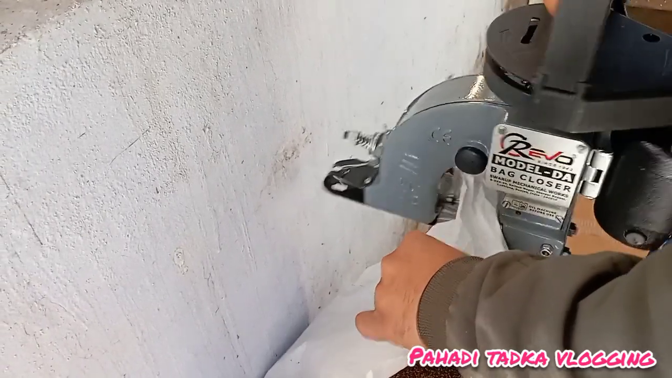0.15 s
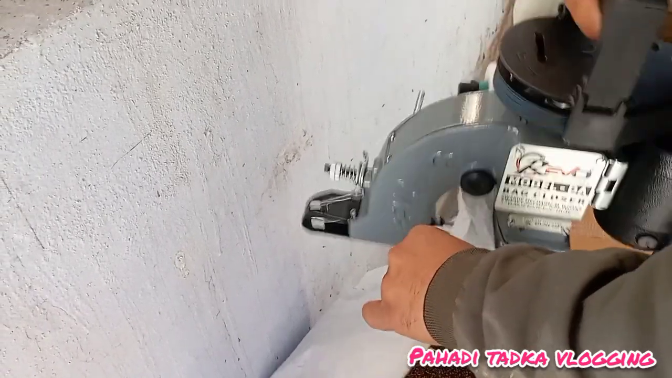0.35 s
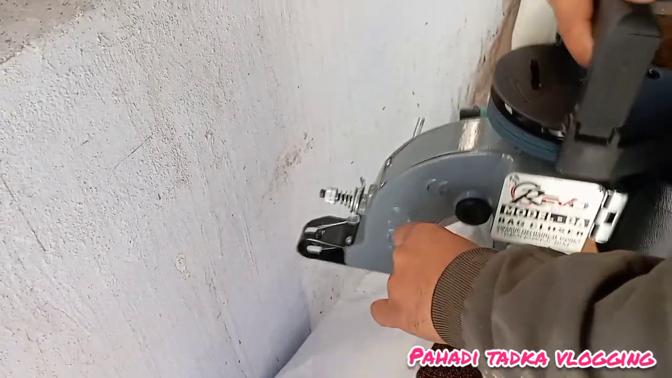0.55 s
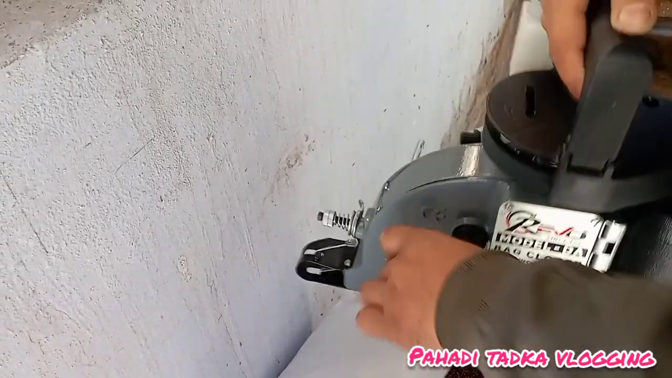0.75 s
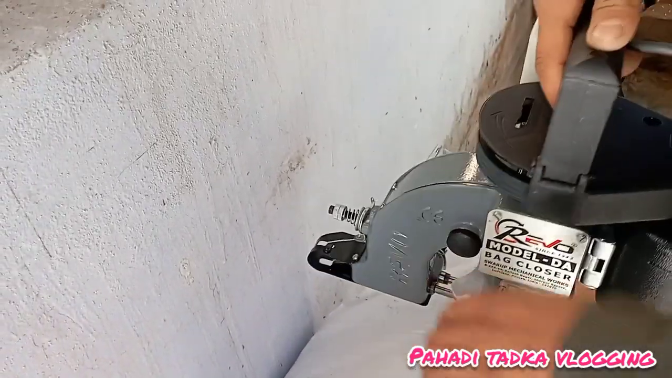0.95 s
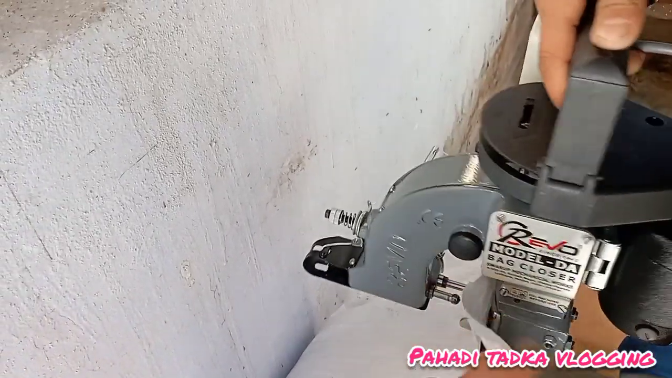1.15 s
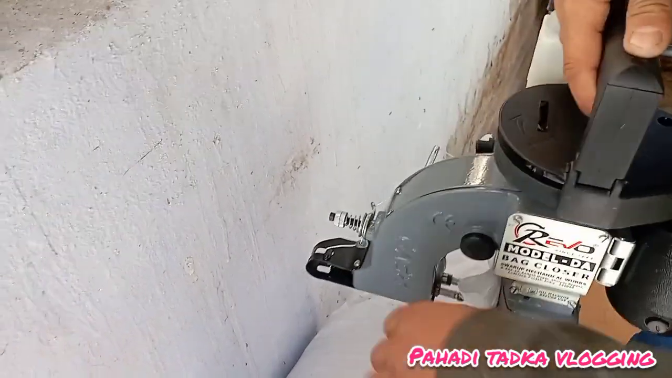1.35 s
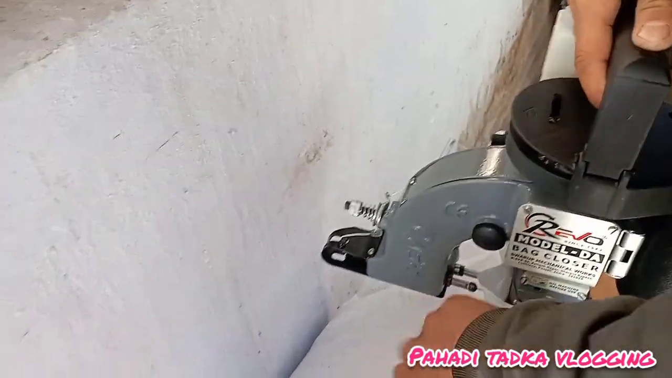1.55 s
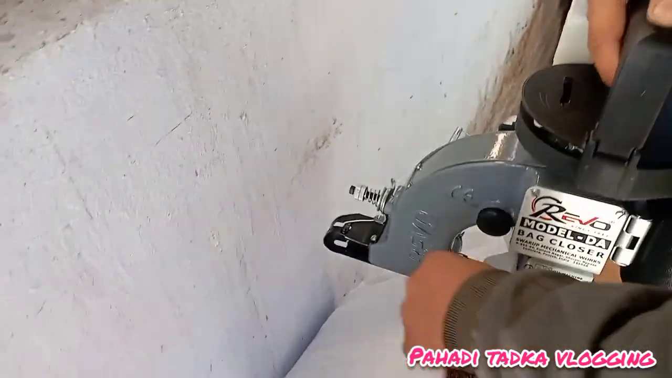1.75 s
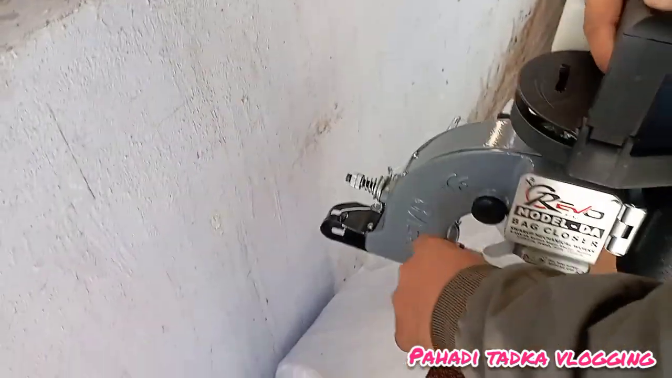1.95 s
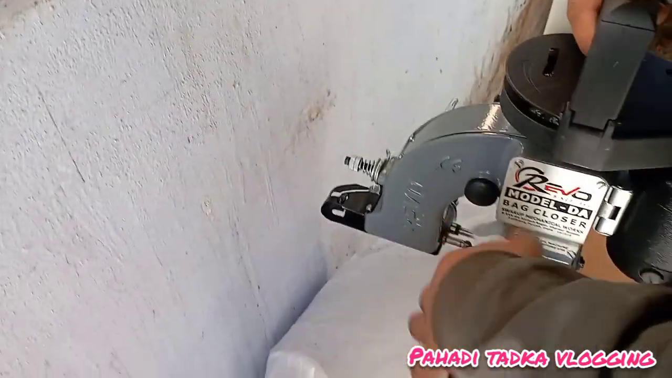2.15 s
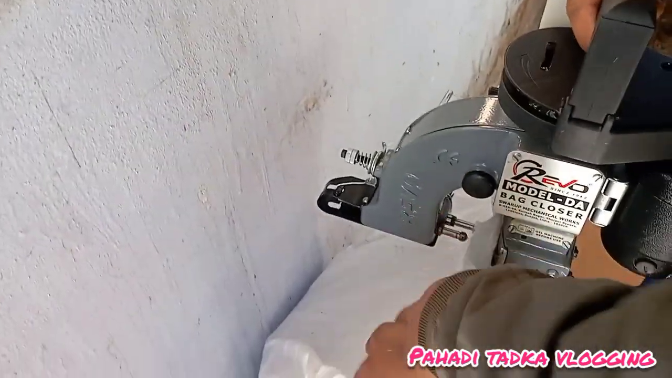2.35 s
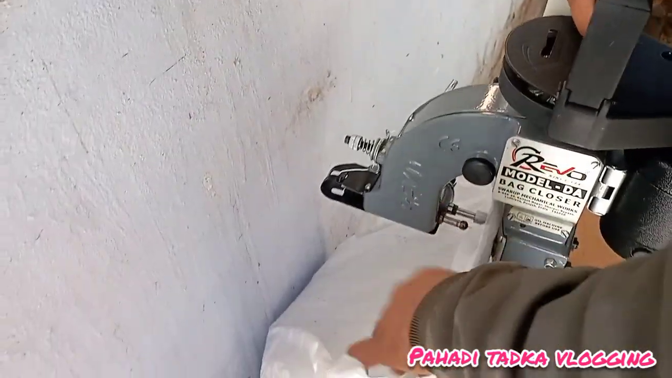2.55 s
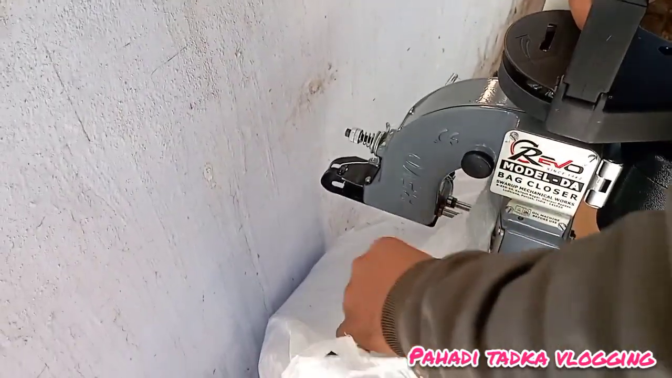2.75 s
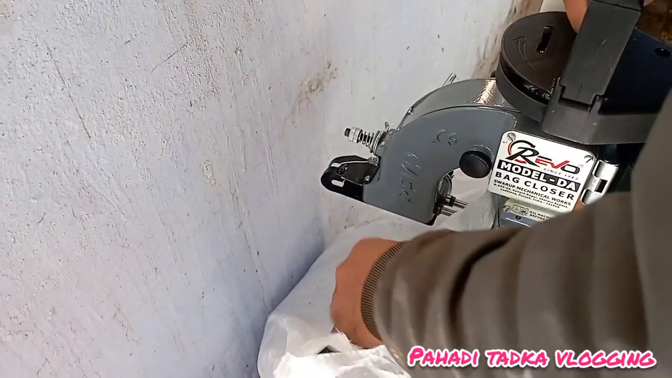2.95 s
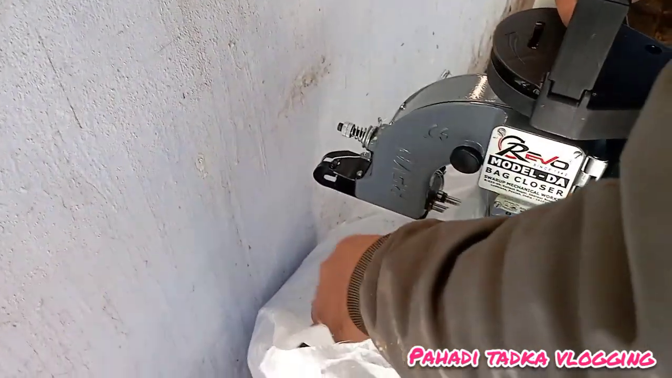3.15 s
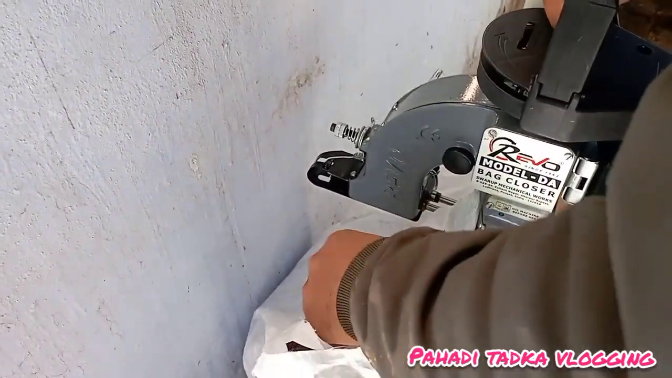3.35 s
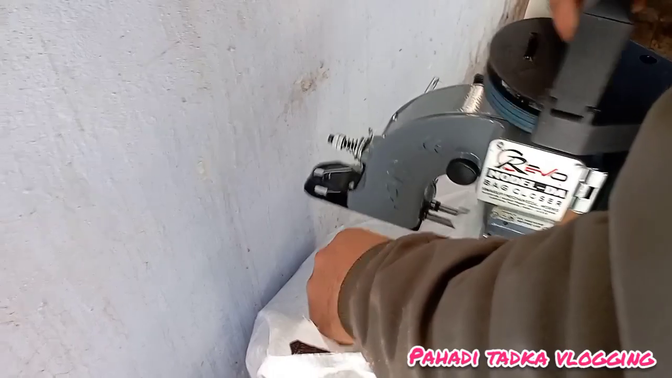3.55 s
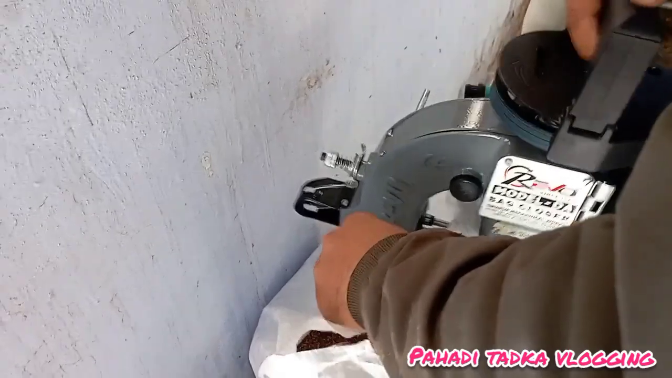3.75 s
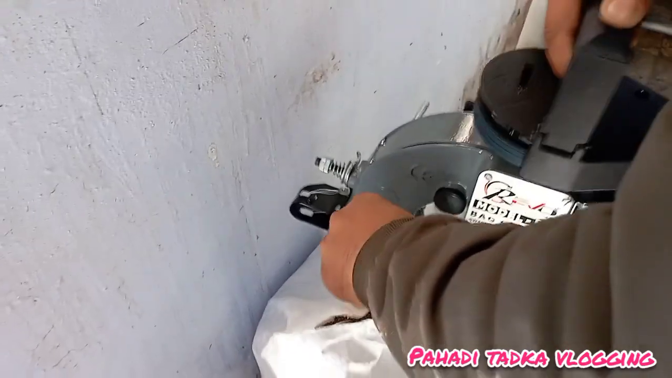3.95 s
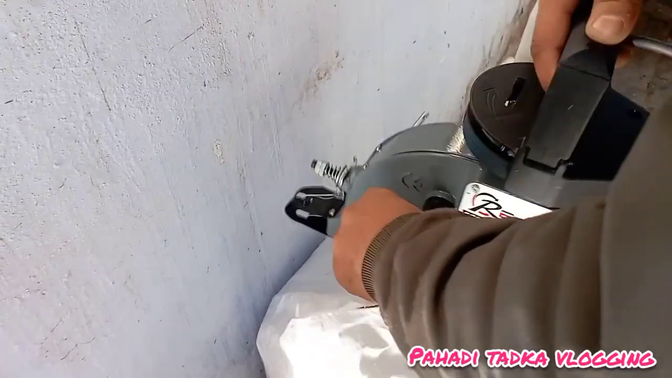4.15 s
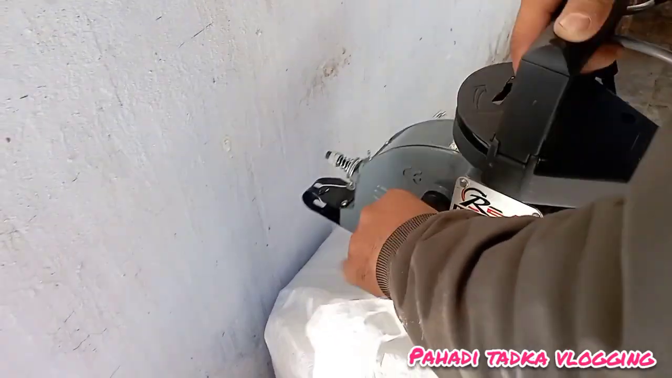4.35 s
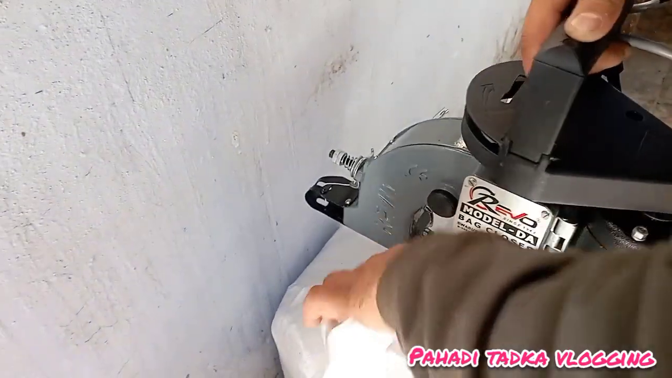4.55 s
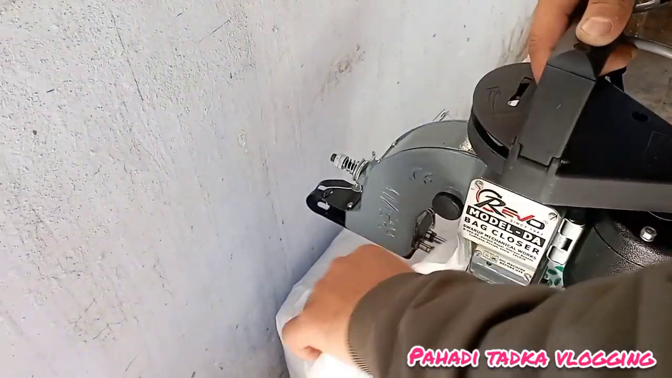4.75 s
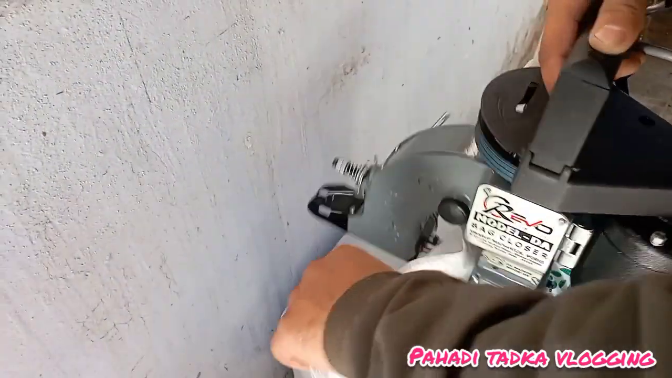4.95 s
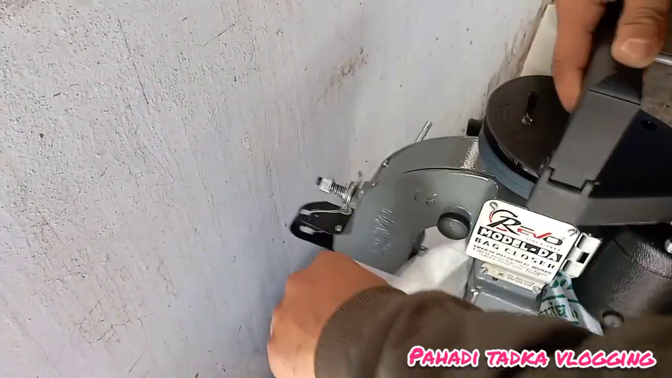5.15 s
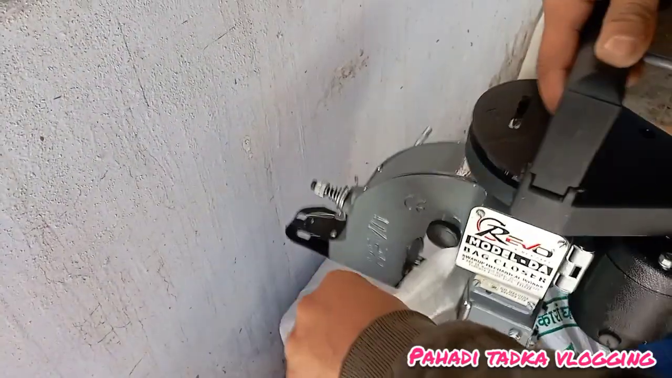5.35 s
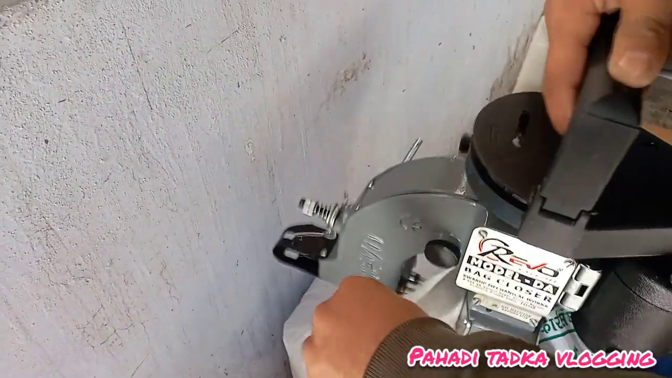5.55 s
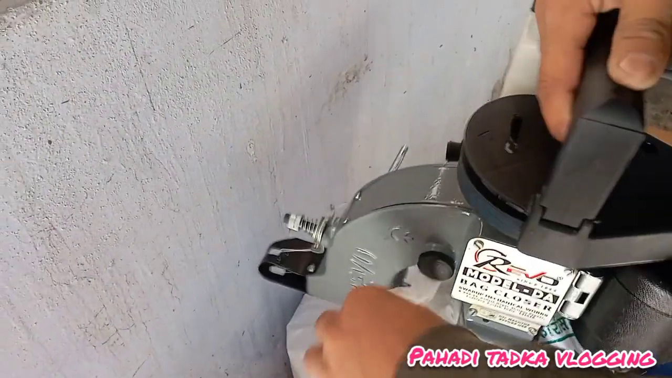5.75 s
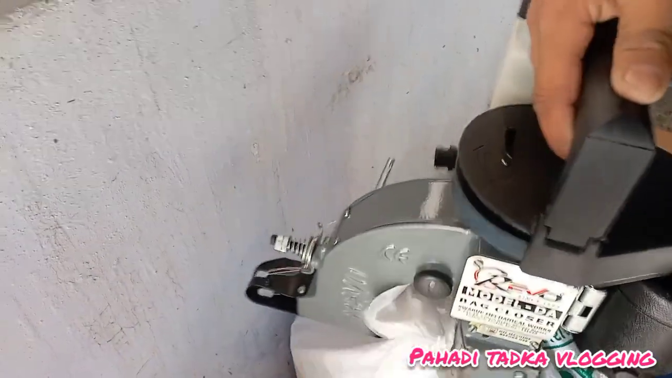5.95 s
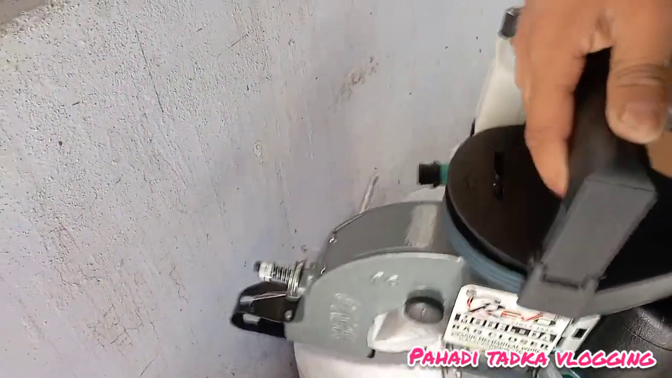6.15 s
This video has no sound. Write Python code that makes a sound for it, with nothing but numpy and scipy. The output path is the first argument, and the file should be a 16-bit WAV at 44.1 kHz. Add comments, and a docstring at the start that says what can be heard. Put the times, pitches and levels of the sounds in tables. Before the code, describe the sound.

Close up, an electric stitching motor revs and winds down, needle mechanism knocking rapidly, with sharp plastic sack creases in the pauses and a final sustained run.

```python
"""Sack-sewing machine in short bursts

A handheld sack-sewing machine runs in short bursts close to a phone with two microphone ports.
The motor whines up and coasts down as slot tones, over filtered noise for brushes and fan;
the needle drive knocks three times a stitch, striking decaying casing and frame modes.
Between bursts a hand creases the woven sack: noise slips crackle, creases snap, the bag rubs in the bass.
"""
import sys
import numpy as np
from scipy import signal
from scipy.fft import rfft, irfft
from scipy.io import wavfile
from scipy.ndimage import uniform_filter1d

SR = 44100
rng = np.random.default_rng(int(sys.argv[2]) if len(sys.argv) > 2 else 0)


def digitize_waveform(pressure):
    """Quantize a signal to 16-bit integers and store it at the path in sys.argv[1].

    Rows of a 2-D input are taken as channels; values are limited to [-1, 1].
    """
    field = np.atleast_2d(pressure).T
    bounded = np.clip(field, -1, 1)
    quanta = np.round(bounded * 32767).astype(np.int16)
    wavfile.write(sys.argv[1], SR, quanta)


def volts_from_db(level):
    """Convert decibel levels to linear amplitude ratios."""
    exponent = np.asarray(level, float) / 20
    return 10 ** exponent


N = 274302
TIME = np.arange(N) / SR

# All levels are relative.
# hand on the sack: start_s, crackle_db, brightness_db_per_octave (about 6 kHz), rub_db
SACK_HANDLING = [(0, -34, 0.8, -35), (.12, -49, -1, -41.5), (.95, -70, -11, -42.5), (1.1, -42, 1, -42.5),
                 (1.46, -52.5, 3, -52), (1.49, -39.5, 3.5, -43.5), (1.63, -46.5, 2.5, -53),
                 (1.68, -46, 2, -40.5), (2.0, -51, 2, -54), (2.12, -46.5, 2.5, -47.5),
                 (2.26, -49.5, 7, -51.5), (2.38, -48, 0.8, -45.5), (2.56, -37.5, 0.1, -40),
                 (2.7, -45.5, 1.5, -44), (2.95, -49, 1, -51), (3.05, -41.5, 2, -47), (3.17, -52, 1.5, -52),
                 (3.5, -54, 0, -55), (4.38, -48, -3.5, -41), (4.51, -46, 1.5, -46), (4.59, -39.5, 0, -41.5),
                 (4.8, -48, 1, -48.5), (4.92, -50.5, 0, -53)]
# loud creases: start_s, peak_db, pitch_hz, lows_db (300 to 2000 Hz, against the snap)
LOUD_CREASES = [(0.0543, -33, 3270, 6), (0.084, -31, 7200, -4), (1.119, -16, 4340, -32),
                (1.2217, -27, 7300, -21), (1.3309, -43, 6780, -19), (1.479, -27, 6510, -22),
                (1.5546, -28, 7710, -3), (1.6379, -19.5, 4470, -27), (1.651, -25, 7800, -34),
                (1.6746, -21, 4280, -24), (1.6827, -18.5, 5840, -15), (1.9014, -29, 7000, -25),
                (2.0083, -35, 5000, -18), (2.0582, -34, 3870, -21), (2.2624, -29, 6480, -16),
                (2.3187, -15, 5900, -27), (2.3397, -29, 6000, -11), (2.4482, -24.5, 2550, 1.5),
                (2.639, -25, 6060, -6), (2.7687, -30, 5820, -13), (2.8033, -12.5, 5400, -25),
                (2.9741, -25, 5950, -13), (3.0077, -20.5, 6400, -25), (3.1268, -45, 5880, -27),
                (3.148, -28, 5700, -7), (3.1572, -29, 6570, -23), (3.1921, -30.5, 6440, -4.5),
                (3.2809, -29.5, 6700, -16), (3.3473, -28, 6630, -18), (3.364, -33.5, 6850, 0),
                (3.4595, -32.5, 7200, -20), (3.4805, -32, 4600, -24), (3.519, -25.5, 7140, -13),
                (4.8196, -22.5, 6860, -16), (4.9487, -22.5, 6800, -15)]
# spectrum of the crackling weave: frequency_hz, level_db
WEAVE_SPECTRUM = [(410, -19), (700, -3.5), (1030, -10.5), (2100, -5.5), (3000, -7), (4010, -3), (5020, -7),
                  (7270, -2.5), (9340, -12), (11000, -11.5), (15000, -19), (15900, -21), (16500, -38)]
# spectrum of the heavy bag rubbing: frequency_hz, level_db
RUB_SPECTRUM = [(18, -72), (30, -54), (57, -7.5), (113, -1), (317, -5), (355, -3), (439, -11.5), (535, -8),
                (640, -12.5), (1500, -25), (1950, -26), (3300, -120)]
# trigger pulls: on_s, off_s, free_running_slot_rate_hz
TRIGGER_PULLS = [(-.9, -.31, 2190), (.1358, .67, 2181), (3.5141, 4.09, 2207), (4.9276, 7, 2215)]
# level against motor speed: level_db at 2200 slots/s, then loss_db per halving under power and coasting
HISS_BY_SPEED = (-17.5, 10.1, 10.4)
DRIVE_BY_SPEED = (-25, 7.3, 5.8)
WHINE_BY_SPEED = (-29, 6, 9)
# the running machine swells and sinks as it is moved about: start_s, hiss_db, needle_drive_db, whine_db
MACHINE_SWAY = [(.25, 2, -0.5, 4.5), (.36, 2, 1.4, 7), (.46, -0.3, 0.5, -2.5), (.68, 0, 2.5, 3),
                (.9, 0, 0.5, 10), (3.6, 0.4, 1.5, 5), (3.87, .5, 4.5, 1), (4.0, -1, -2, -10),
                (4.15, -1.9, 1.5, 5), (5.0, -0.8, 3, 7.2), (5.23, 1.5, 1.5, -6), (5.48, -0.3, 0.9, 3),
                (5.71, -.5, .1, -3.5), (5.95, 1.5, -1, 3.5), (6.22, .5, -1, 5)]
# whine partials: multiple of slot rate, clean_db, smeared_db, smear_rate_hz,
# slow_loss_db (per halving of speed, before the power or coasting share)
WHINE_PARTIALS = [(1, -9, -13, 110, 4), (1.091, -4, -18, 120, 60), (1.136, -4, -18, 120, 60),
                  (2, 2, -9, 250, 16), (3, -12, 1, 704, 45), (4, -22, -3, 600, 45), (5, -17.5, -5, 700, 45)]
# casing response to the whine: frequency_hz, level_db
SHELL_RESPONSE = [(300, -22), (640, -8), (750, 11), (880, -3), (1100, -3), (1300, -1), (1670, 4),
                  (2050, -7), (2260, -10), (2400, 4), (2530, -8), (2900, -9), (3500, 3), (4400, 1),
                  (12000, 1)]
# spectrum of brushes and fan: frequency_hz, level_db
HISS_SPECTRUM = [(600, -30.5), (1000, -14.5), (1450, -18.5), (1670, -12.5), (2030, -14), (2440, -13.5),
                 (2850, -17), (3900, -9.5), (5200, -14), (6790, -1.5), (9400, -9.5), (10900, -10.5),
                 (15200, -18.5), (16500, -79)]
# one main knock of each burst, to which its stitches are aligned: start_s
MAIN_KNOCKS = [.519, 3.857, 5.6275]
# knocks within a stitch: share of the cycle, casing_db, frame_thud_db, tick_db
STITCH_KNOCKS = [(.001, 0, -3, -1), (.33, -12, -9, -8), (.6, -6, 0, -2)]
# casing modes: pitch_hz, level_db, t60_s
CASING_MODES = [(743.7, -0.5, 0.084), (840.4, -5, 0.044), (1190, -8, 0.0087), (665, -4.5, 0.032)]
# frame and arm modes: pitch_hz, level_db, t60_s
FRAME_MODES = [(115.7, -4.5, 0.26), (178.4, -1, 0.096), (294.6, -2, 0.096), (344.7, -4, 0.16),
               (404.6, 3.5, 0.053), (506.5, -10, 0.16), (564, -0.5, 0.052)]
# direct sound reaching the left port behind the phone: frequency_hz, level_db
PHONE_SHADOW = [(40, -.4), (120, -.15), (300, -.6), (800, -1.2), (1300, -7), (2500, -13)]
# left port over right port: frequency_hz, level_db
PORT_BALANCE = [(60, 1.5), (150, 1.5), (380, -1.5), (700, -1.5), (1300, -1), (2400, -2), (3500, -9),
                (5500, -13), (7500, -10), (9500, -3), (12000, -11), (15000, -11)]
# microphone bass response: frequency_hz, level_db
MIC_RESPONSE = [(20, -56), (50, -5), (90, -3.5), (130, -1.5), (300, 0.08)]


def curve(table):
    """Columns of a row table along the time axis."""
    start_s, *columns = np.transpose(table)
    return [np.interp(TIME, start_s, column) for column in columns]


def unit(x):
    """Scale to rms 1."""
    return x / np.sqrt(np.mean(x ** 2))


def read(points, hz):
    """Level in dB of a spectrum at given frequencies, on a log frequency axis."""
    f, db = np.transpose(points)
    return np.interp(np.log(hz + 1), np.log(f), db)


def colour(x, points):
    """Causal filter with the given spectrum, from the folded cepstrum."""
    log_gain = read(points, np.fft.rfftfreq(4096, 1 / SR)) * np.log(10) / 20
    cepstrum = irfft(log_gain)
    cepstrum[1:2048] *= 2
    cepstrum[2049:] = 0
    return signal.fftconvolve(x, irfft(np.exp(rfft(cepstrum))))[:N]


def band_noise(noise, order, low_hz, high_hz):
    """Noise held to one band."""
    return signal.lfilter(*signal.butter(order, [low_hz, high_hz], "band", fs=SR), noise)


def walk(rate_hz):
    """Smoothed random drift of rms 1."""
    k = max(int(SR / rate_hz), 2)
    return unit(uniform_filter1d(uniform_filter1d(rng.standard_normal(N), k), k))


def grit(per_s, spread_db):
    """Random clicks of uneven size."""
    size_db = spread_db * np.minimum(rng.exponential(size=N), 3)
    return (rng.random(N) < per_s / SR) * np.sign(rng.standard_normal(N)) * volts_from_db(size_db)


def bursts(per_s, spread_db, t60_s):
    """Envelope of random slips, each dying away in a few ms."""
    fall = volts_from_db(-60 / (t60_s * SR))
    return unit(signal.lfilter([1], [1, -fall], np.abs(grit(per_s, spread_db))))


def crackle(bright_db):
    """Plastic threads slip in clusters; every octave also has slips of its own."""
    shared = bursts(120, 4.5, 0.009)
    out = 0
    for hz in (1000, 2000, 4000, 8000, 14000):
        edges_hz = [hz / 2 ** 0.5, min(hz * 2 ** 0.5, 20000)]
        band = signal.butter(2, edges_hz, "band", fs=SR, output="sos")
        slips = 1.46 + shared + 0.49 * bursts(100, 4.6, 0.013)
        tilt = volts_from_db(bright_db * np.log2(hz / 6000) + 1.2 * walk(18))
        out = out + tilt * slips * signal.sosfilt(band, rng.standard_normal(N))
    return colour(out, WEAVE_SPECTRUM)


def settling():
    """Power of the crackle set off by each loud crease, dying away as the weave settles."""
    below_peak_db, t60_s = -20, 0.24
    kicks = np.zeros(N)
    for start_s, peak_db, *_ in LOUD_CREASES:
        kicks[int(start_s * SR)] = volts_from_db(2 * (peak_db + below_peak_db))
    return signal.lfilter([1], [1, -volts_from_db(-120 / (t60_s * SR))], kicks)


def rub():
    """The heavy bag rubs: unsteady noise, mostly bass."""
    return unit(colour(rng.standard_normal(N) * volts_from_db(walk(39)), RUB_SPECTRUM))


def small_creases(crackle_db):
    """Sixty creases at random times and pitches, their peaks riding on the crackle level."""
    over_crackle_db, scatter_db = 9, 2.5
    low_hz, high_hz, lows_db = 3840, 8150, -13
    small = []
    for when, size, pitch in rng.random((60, 3)):
        start_s = when * TIME[-2001]
        peak_db = np.interp(start_s, TIME, crackle_db) + over_crackle_db - scatter_db * np.log(1 - size)
        small.append((start_s, peak_db, low_hz + (high_hz - low_hz) * pitch, lows_db))
    return small


def add_creases(out, creases):
    """Each crease is a snap of band noise with a thump below, rising in 0.45 ms and dying fast."""
    t = TIME[:2000]
    shape = volts_from_db(-60 * t / 0.013) * np.minimum(t / 0.00045, 1)
    noise = rng.standard_normal((len(creases), 2, len(t)))
    for (start_s, peak_db, hz, lows_db), (high, low) in zip(creases, noise):
        snap = band_noise(high, 2, hz * 0.68, min(hz * 1.53, 18000)) * shape
        thump = band_noise(low, 1, 300, 2000) * shape
        i = int(start_s * SR)
        both = snap / np.abs(snap).max() + volts_from_db(lows_db) * thump / np.abs(thump).max()
        out[i:i + len(t)] += volts_from_db(peak_db) * both


def sack():
    """The weave crackles, single creases snap and settle, the heavy bag rubs in the bass."""
    crackle_db, bright_db, rub_db = curve(SACK_HANDLING)
    crackle_level = np.sqrt(volts_from_db(2 * crackle_db) + settling())
    out = crackle_level * unit(crackle(np.clip(bright_db, -5, 5)))
    out += volts_from_db(rub_db) * rub()
    add_creases(out, small_creases(crackle_db) + LOUD_CREASES)
    return out


def speed():
    """Slot rate: torque fades as the rotor nears its free speed; bearings and fan brake it after release."""
    spin_up_s, spin_up_power = 0.2172, 2.632
    bearing_drag_hz_per_s, fan_drag_s = 3550, 0.62
    stall = bearing_drag_hz_per_s * fan_drag_s
    hz = np.full(N, 2.0)
    for on_s, off_s, top_hz in TRIGGER_PULLS:
        powered_s = np.clip(TIME - on_s, 0, off_s - on_s)
        spun = top_hz * (1 - (1 + powered_s / spin_up_s) ** -spin_up_power)
        coast = np.exp(-np.maximum(TIME - off_s, 0) / fan_drag_s)
        hz = np.maximum(hz, (spun + stall) * coast - stall)
    return hz


def loudness(hz, law):
    """Level in dB from speed, with one slope under power and another while coasting."""
    top_db, powered_db, coasting_db = law
    coasting = uniform_filter1d(1.0 * (np.gradient(hz) <= 0), 400)
    return top_db + np.log2(hz / 2200) * (powered_db + (coasting_db - powered_db) * coasting)


def brush_and_fan_hiss():
    """Turbulent, fluttering fan noise with the gritty clicks of the brushes."""
    air = rng.standard_normal(N) * volts_from_db(1.26 * walk(240))
    return unit(colour(air + 0.47 * unit(grit(1500, 5.9)), HISS_SPECTRUM))


def whine(hz, slots):
    """Slot tones, part clean, part smeared as the stitch load makes the speed waver, shaped by the casing."""
    tones = 0
    octaves = np.log2(hz / 2200)
    steady_db = 18 * octaves  # upper tones sharpen only near full speed
    # no current, no magnetic pull on the slots
    coasting = uniform_filter1d(1.0 * (np.gradient(hz) < 0), 1500)
    for k, clean_db, smear_db, smear_rate_hz, slow_db in WHINE_PARTIALS:
        wobble = walk(smear_rate_hz) + 1j * walk(smear_rate_hz)
        clean = volts_from_db(clean_db + (k - 1) * steady_db + 1.2 * walk(20))
        tone = (clean + volts_from_db(smear_db) * wobble) * np.exp(2j * np.pi * k * slots)
        level_db = read(SHELL_RESPONSE, k * hz) + slow_db * octaves * (0.5 + 0.35 * coasting)
        tones = tones + volts_from_db(level_db) * tone.real
    return tones


def ring(x, modes):
    """Strike decaying modes; neighbours start in opposite phase, so the sound swells for a few ms."""
    t = TIME[:SR // 4]
    response = np.zeros(len(t))
    for k, (hz, db, t60_s) in enumerate(modes):
        response += (-1) ** k * volts_from_db(db) * np.sin(2 * np.pi * hz * t) * volts_from_db(-60 * t / t60_s)
    return signal.fftconvolve(x, response)[:N]


def stitch_blows(slots):
    """Cams strike casing, frame and tick at fixed points of each stitch, with slight scatter."""
    slots_per_stitch = 71.0
    burst = np.searchsorted([0, 2, 4.7], TIME, side="right") - 1  # bursts parted at these seconds
    stitch = (slots - np.interp(MAIN_KNOCKS, TIME, slots)[burst]) / slots_per_stitch
    blows = np.zeros((3, N))
    for share, *levels_db in STITCH_KNOCKS:
        at = np.flatnonzero(np.diff(np.floor(stitch - share)) == 1)
        chance = rng.standard_normal((N // 500, 2))[:len(at)]
        at = np.clip(at + (4 * chance[:, 0]).astype(int), 0, N - 1)
        blows[:, at] += volts_from_db(np.array(levels_db)[:, None] + 1.2 * chance[:, 1])
    return blows


def needle_drive(slots, drive_db):
    """Cam blows ring the casing, thud in the frame and tick; loose parts rattle in between."""
    casing_blows, frame_blows, tick_blows = stitch_blows(slots)
    casing_blows *= (np.gradient(slots) * SR / 2200) ** 0.88  # slow cams barely ring the casing
    rattle = grit(900, 3.9)
    soft = signal.windows.hann(45)  # a blow lasts about a millisecond, a third of it on the casing
    casing = ring(np.convolve(casing_blows + volts_from_db(-32) * rattle, soft[::3], "same"), CASING_MODES)
    frame = ring(np.convolve(frame_blows + volts_from_db(-17.5) * rattle, soft, "same"), FRAME_MODES)
    tick_noise = rng.standard_normal(400) * volts_from_db(-60 * TIME[:400] / 0.01)
    tick = signal.fftconvolve(tick_blows, tick_noise)[:N]
    tick = colour(tick, [(500, -3), (1200, 9), (3300, 23), (7000, 21), (16000, -90)])
    loud = TIME > 5.2  # the three are balanced over the last burst
    parts = ((casing, -2.5), (frame, -3), (tick, -12))
    return volts_from_db(drive_db) * sum(volts_from_db(db) * part / np.std(part[loud]) for part, db in parts)


def machine():
    """Motor and needle drive share one speed; each layer's level follows it and the sway."""
    hz = speed()
    slots = np.cumsum(hz) / SR  # rotor slots passed
    hiss_sway, drive_sway, whine_sway = curve(MACHINE_SWAY)
    drive = needle_drive(slots, loudness(hz, DRIVE_BY_SPEED) + drive_sway)
    tones = volts_from_db(loudness(hz, WHINE_BY_SPEED) + whine_sway) * whine(hz, slots)
    hiss = volts_from_db(loudness(hz, HISS_BY_SPEED) + hiss_sway) * brush_and_fan_hiss()
    return drive + tones + hiss


def smear(x, t60_s):
    """Turn each click into a short noisy burst of unit energy."""
    t = TIME[:int(t60_s * SR)]
    tail = rng.standard_normal(len(t)) * volts_from_db(-60 * t / t60_s)
    return signal.fftconvolve(x, tail / np.sqrt(np.sum(tail ** 2)))[:N]


def scatter(x, t60_s):
    """Echoes off hands, wall and floor; the paths change as hands and phone move."""
    weights = np.array([walk(17.6) for _ in range(4)])
    weights /= np.sqrt(np.sum(weights ** 2, axis=0))
    return sum(w * smear(x, t60_s) for w in weights)


def scene():
    """The right port faces the machine; the left lies in the phone's shadow and hears its treble by echoes."""
    near = sack() + machine()
    # echoes fill in the power that the shadow takes away
    echo = [(f, 10 * np.log10(1 - min(volts_from_db(2 * db), 0.999))) for f, db in PHONE_SHADOW]
    lead = 9 + 4 * walk(2)  # samples by which the left port leads as the phone tilts
    direct = colour(np.interp(TIME + lead / SR, TIME, near), PHONE_SHADOW)
    left = direct + colour(scatter(near, 0.037), echo)
    right = near + volts_from_db(-12) * colour(smear(near, 0.25), echo)
    left_tone = [(f, 20 * np.log10(2 / (1 + volts_from_db(-db)))) for f, db in PORT_BALANCE]
    right_tone = [(f, 20 * np.log10(2 / (1 + volts_from_db(db)))) for f, db in PORT_BALANCE]
    return np.array([colour(left, left_tone), colour(right, right_tone)])


def band_limit(x):
    """A steep low-pass at the top of the band."""
    return signal.sosfilt(signal.butter(12, 17020, fs=SR, output="sos"), x)


def record(dry):
    """The microphones lose the deep bass; the phone rounds the loudest peaks."""
    heard = np.array([colour(port, MIC_RESPONSE) for port in dry])
    mix = np.tanh(1.115 * heard) / 1.055
    return band_limit(mix)


dry = scene()
out = record(dry)
digitize_waveform(out)
```